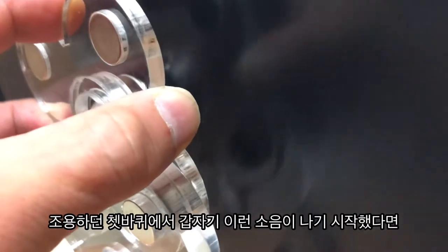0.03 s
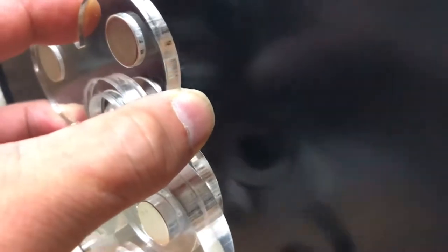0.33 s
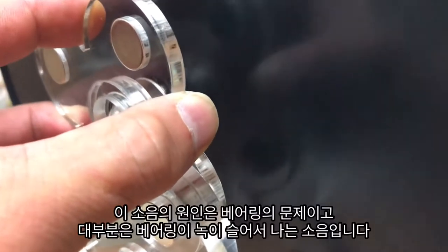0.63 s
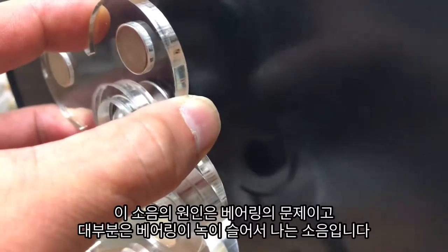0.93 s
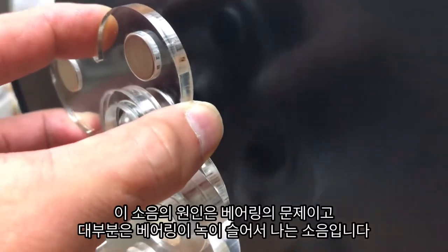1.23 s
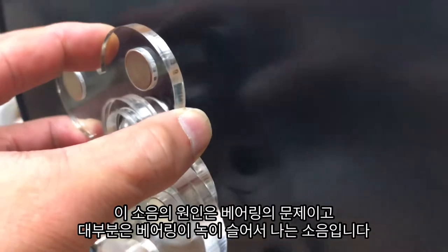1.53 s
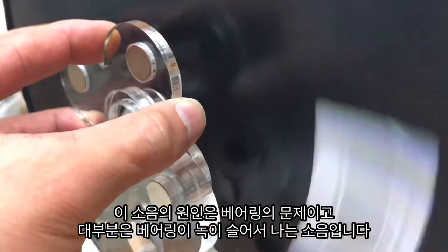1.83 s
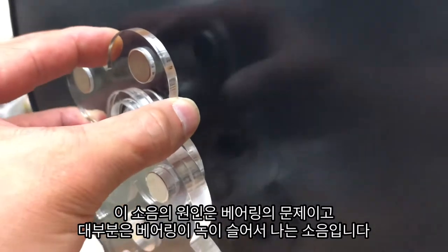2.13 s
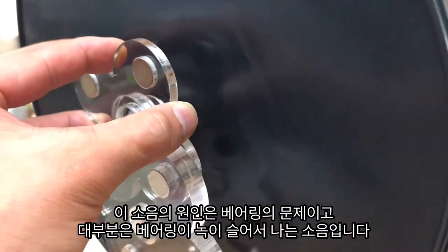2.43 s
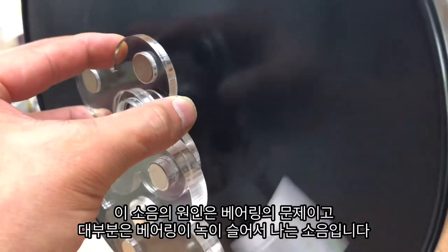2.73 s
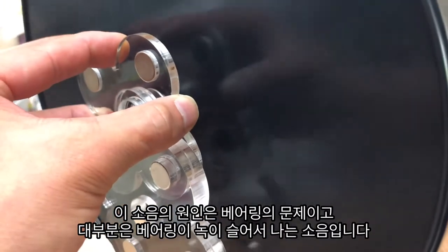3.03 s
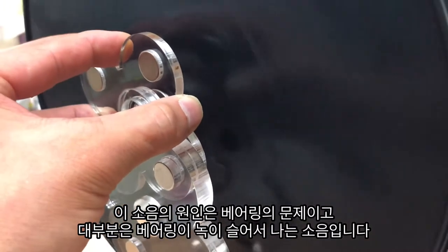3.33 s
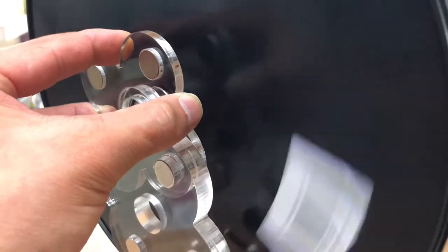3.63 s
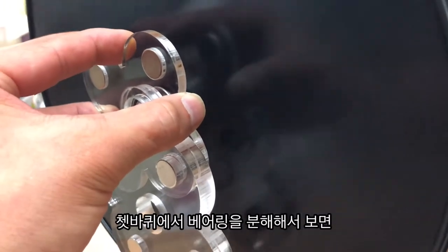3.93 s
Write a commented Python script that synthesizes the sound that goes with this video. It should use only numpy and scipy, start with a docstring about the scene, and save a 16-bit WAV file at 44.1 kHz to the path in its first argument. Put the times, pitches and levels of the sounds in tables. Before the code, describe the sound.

Close up in a quiet room, a spinning hamster wheel rumbles and grinds on a rough bearing, gradually getting slightly softer. Small dull knocks, light plastic clicks and brief finger rubs are scattered over a soft hiss.

```python
"""A low, unevenly booming rumble and a rusty grind: a plastic hamster wheel coasting in a quiet room,
held by its stand close to the microphone. Balls rolling over the bearing's pitted race shake the drum
and make the hub grind; bigger pits knock, and dry steel squeaks faintly once. The stand creaks with
small ticks in the hand and fingers slide on it, over a soft hiss."""
import sys
import numpy as np
from scipy import signal
from scipy.fft import rfft, irfft, next_fast_len
from scipy.io import wavfile
from scipy.ndimage import uniform_filter1d, minimum_filter1d, map_coordinates

SR = 44100
rng = np.random.default_rng(int(sys.argv[2]) if len(sys.argv) > 2 else 0)


def put_to_file(sound):
    """Save the sound as 16-bit audio at rate SR, in the file named by the first command-line argument."""
    columns = np.atleast_2d(sound).T  # one column per channel
    safe = np.clip(columns, -1, 1)
    whole_steps = np.round(safe * 32767)
    wavfile.write(sys.argv[1], SR, whole_steps.astype(np.int16))


N = 176400
T = np.arange(N) / SR

# the drum booms and its pitch bends: (time [s], lift [dB], pitch [Hz])
BOOMS = [(.03, 2.5, 256.3), (.106, 2, 252.3), (.176, 6.5, 254.2), (0.363, 5, 257.2), (.43, 5, 251.2),
         (.526, 3.5, 252.5), (.608, 6.5, 242.2), (0.739, 4.5, 259.8), (1.078, 4.5, 260.8), (1.275, 5, 251),
         (1.467, 4.5, 240.2), (1.538, 4.5, 262), (1.711, 4.5, 239), (1.833, 6, 240.7), (1.978, 5, 245.6),
         (2.413, 2.5, 253.7), (2.537, 6, 245.8), (2.63, 2, 236.5), (2.822, 5.5, 244), (2.875, 7.5, 251.6),
         (3.021, 6.5, 250.5), (3.158, 1.5, 240), (3.27, 6, 246), (3.417, 5.5, 239.7), (3.508, 3.5, 237.7),
         (3.593, 3, 257.4), (3.772, 6.5, 247.8), (3.975, 8, 241)]


def from_db(db):
    """Decibels to gain."""
    return 10 ** (np.asarray(db) / 20)


def unit_rms(x):
    """Scale to an rms of 1."""
    return x / np.sqrt(np.mean(x ** 2) + 1e-20)


def curve(rows):
    """Join (time [s], value) points at every sample."""
    return np.interp(T, *np.transpose(rows))


def swell(time, half_length):
    """A smooth rise and fall around one moment, both in seconds."""
    return np.exp(-((T - time) / half_length) ** 2)


def drift(rate_hz):
    """A smooth random wander with a spread of about 1."""
    step, settle = 40, 2000
    pole = np.exp(-2 * np.pi * rate_hz * step / SR)
    noise = rng.standard_normal(N // step + settle + 2)
    slow = signal.lfilter([1], [1, -2 * pole, pole * pole], noise)[settle:]
    return np.interp(np.arange(N) / step, np.arange(len(slow)), unit_rms(slow))


def coloured(x, response):
    """Pass through a body with this (frequency [Hz], gain [dB]) response, scaled to unit energy."""
    size = 2 * next_fast_len(len(x) // 2 + SR // 10)
    hz, db = np.transpose(response)
    bin_hz = np.arange(size // 2 + 1) * SR / size
    gain = unit_rms(from_db(np.interp(np.log(bin_hz + 1), np.log(hz), db)))
    # minimum phase: the body rings only after it is struck
    cepstrum = irfft(np.log(gain))
    cepstrum[1:size // 2] *= 2
    cepstrum[size // 2 + 1:] = 0
    return irfft(rfft(x, size) * np.exp(rfft(cepstrum)))[:len(x)]


def tilted(response, db_per_octave, pivot_hz=5500):
    """Make a response brighter or duller."""
    return [(hz, db + db_per_octave * np.log2(hz / pivot_hz)) for hz, db in response]


def resonance(hz, width):
    """A steep-sided resonance kept ringing by fine roughness; rms 1."""
    pole = np.exp(-np.pi * width / SR)
    section = [1 - pole, 0, pole - 1, 1, -2 * pole * np.cos(2 * np.pi * hz / SR), pole * pole]
    return unit_rms(signal.sosfilt([section, section], rng.standard_normal(N + SR))[SR:])


def ringing(modes):
    """Several resonances together, each fading or growing at its own rate."""
    return sum(from_db(db + slope * T) * resonance(hz, width) for hz, width, db, slope in modes)


def add(out, time, sound):
    """Mix a short sound in at its time."""
    start = int(np.clip(time * SR, 0, N - 1))
    out[start:start + len(sound)] += sound[:N - start]


def boom_lift_db():
    """How far the booms lift the vibration."""
    return sum(db * swell(time, half_length=0.018) for time, db, _ in BOOMS)


def background_hiss():
    """Soft hiss behind the wheel, a little louder at first."""
    # colour of the hiss: (frequency [Hz], gain [dB])
    colour = [(100, -5), (1500, 17), (3000, 8), (4500, 4.5), (7000, -1.5), (11000, -1), (13500, -7),
              (15000, 3), (16000, -0.5)]
    # its course: (time [s], level [dB])
    levels = [(0, -52.5), (.6, -56.5), (2, -57), (4, -57)]
    return unit_rms(coloured(rng.standard_normal(N), colour)) * from_db(curve(levels))


def finger_rubs():
    """Skin slides over the stand: a grainy rasp when pressed, an airy swish when light."""
    # finger strokes: (middle [s], half length [s], rasp [dB], brightness [dB/octave], swish [dB])
    strokes = [(.069, .028, -52.5, 3, -55), (.238, 0.0031, -66, 0, -48), (0.287, 0.049, -46, .5, -60),
               (.815, .045, -73, 2, -56.5), (1.011, .019, -46.5, 1, -63), (1.222, 0.053, -53, -2.5, -72),
               (1.46, 0.014, -55, -3, -53), (2.255, .035, -57.5, 1, -62), (3.17, .03, -86, 0, -59)]
    # pressed skin: (frequency [Hz], gain [dB])
    rasp_colour = [(1000, 3.5), (2200, -2), (2900, 10), (3600, 2.5), (5000, 4.5), (7000, -1), (11000, -13),
                   (15000, -9)]
    # a light touch: (frequency [Hz], gain [dB])
    swish_colour = [(4000, -28), (8000, -1.5), (12000, -4), (14500, 4), (16000, -1)]
    grain_db = 3.5
    friction = rng.standard_normal(N) * from_db(grain_db * drift(rate_hz=250))
    swish = unit_rms(coloured(rng.standard_normal(N), swish_colour))
    out = np.zeros(N)
    for time, half_length, rasp_db, brightness, swish_db in strokes:
        rasp = unit_rms(coloured(friction, tilted(rasp_colour, brightness)))
        out += swell(time, half_length) * (from_db(rasp_db) * rasp + from_db(swish_db) * swish)
    return out


def stand_ticks():
    """Hard plastic slips in the hand: a faint first slip, then a snap and a brief ring of the stand."""
    # each tick: (time [s], relative level [dB], brightness [dB/octave])
    ticks = [(.007, -36.5, -0.5), (.014, -42, -2.5), (.096, -46, -1), (.318, -43, 1), (.631, -52, -5),
             (.684, -43.5, -1), (0.694, -42, -1.5), (.983, -38.5, -1.5), (1.001, -41, 0), (1.016, -42, 0),
             (1.118, -39.5, -.5), (1.149, -38.5, -0.5), (1.156, -42, 1), (1.162, -41, 0),
             (1.193, -38.5, -1), (1.21, -41, -2), (1.227, -39, 1), (1.236, -43, -3), (1.422, -44, -1),
             (1.443, -39.5, -1), (1.452, -32, 2), (1.477, -43, 3), (1.594, -44, .5), (1.6, -37, .5),
             (1.722, -44.5, -4.5), (1.727, -46, -4), (2.095, -40, .5), (2.099, -40, 0), (2.143, -46.5, -1),
             (2.218, -40.5, 1.5), (2.221, -43, -1), (2.234, -42, 3), (2.252, -42, 1), (2.254, -42.5, 1),
             (2.272, -40, 1), (2.277, -45, 0), (2.411, -42, 1.5), (2.472, -51.5, -4), (2.585, -44, 0.5),
             (2.605, -48, -2), (3.586, -50.5, -3.5), (3.656, -45.5, -1)]
    # snapping plastic: (frequency [Hz], gain [dB])
    snap_colour = [(800, -28), (2000, 0.5), (2900, 3), (3700, 2.5), (4600, -1), (6500, 2), (9000, -1.5),
                   (12000, -3), (16000, -9)]
    # resonances of the stand: (frequency [Hz], relative level [dB], decay [s])
    stand_modes = [(2887, -20.5, .003), (3830, -25, 0.0028), (5970, -31.5, 0.0024), (8650, -33, 0.0033)]
    rise_s, decay_s, tail_s, tail_db = 0.00045, 0.001, 0.011, -28
    gain_db, slip_db, slip_lead_s = 15.5, -19, 0.0042
    out, t = np.zeros(N), T[:SR // 20]
    rise = 1 - np.exp(-(t / rise_s) ** 2)
    envelope = rise * (np.exp(-t / decay_s) + from_db(tail_db) * np.exp(-t / tail_s))
    for time, db, brightness in ticks:
        colour = [(hz, level + rng.normal(0, 1.5)) for hz, level in tilted(snap_colour, brightness)]
        slip, snap = [coloured(rng.standard_normal(len(t)) * envelope, colour) for _ in range(2)]
        ring = np.zeros(len(t))
        for hz, level, decay in stand_modes:
            amplitude = from_db(level + rng.normal(0, 2)) * np.exp(-t / decay)
            ring += amplitude * np.sin(2 * np.pi * hz * rng.normal(1, 0.035) * t)
        ring *= rise * from_db(-1.8 * brightness)  # duller snaps ring more
        add(out, time - slip_lead_s, from_db(db + gain_db + slip_db) * slip / np.linalg.norm(slip))
        add(out, time, from_db(db + gain_db) * (snap / np.linalg.norm(snap) + ring))
    return out


def bearing_squeak():
    """Dry steel in the bearing sings for a moment, faint and thin."""
    return from_db(-67) * swell(time=1.66, half_length=0.06) * resonance(hz=8550, width=350)


def pit_knocks():
    """A ball drops into a bigger pit and gives a brief, dull clatter in the hub."""
    # each drop: (time [s], relative level [dB])
    drops = [(0.019, -21), (.344, -28), (0.43, -29), (0.603, -27), (.624, -22.5), (0.757, -27), (.882, -25),
             (0.937, -30), (.954, -23), (1.067, -26.5), (1.16, -30), (1.193, -26), (1.273, -31),
             (1.321, -29.5), (1.511, -29), (1.575, -31), (2.009, -29), (2.487, -40), (2.508, -34),
             (2.917, -40), (3.398, -35), (3.43, -34.5), (3.76, -30.5), (3.837, -31.5)]
    # the hub's response to a drop: (frequency [Hz], gain [dB])
    colour = [(250, -41), (450, -1), (620, 6), (800, 3.5), (1050, 7.5), (1350, -3), (1550, -18.5),
              (4000, -39), (16000, -38)]
    gain_db, decay_s = 15.5, 0.0015
    out, t = np.zeros(N), T[:SR // 20]
    for time, db in drops:
        knock = coloured(rng.standard_normal(len(t)) * np.exp(-t / decay_s), colour)
        add(out, time, from_db(db + gain_db) * knock / np.linalg.norm(knock))
    return out


def bearing_grind():
    """Dense contacts with rust grains excite the hub, harder in the booms, softer as the wheel slows."""
    # how hard the bearing grinds: (time [s], relative level [dB])
    levels = [(0, -38.5), (.9, -39.5), (1.6, -41.5), (2.2, -42.5), (2.9, -44), (4, -44)]
    # the response of hub and drum wall to one contact: (frequency [Hz], gain [dB])
    hub_colour = [(200, -14), (400, -1.5), (470, 6), (545, 5), (610, 8.5), (640, 4.5), (675, -1),
                  (800, 0.5), (1000, 1), (1130, 0), (1220, -3.5), (1350, -1.5), (1500, -16), (2300, -22),
                  (2900, -18.5), (3400, -25.5), (6000, -29), (16000, -53)]
    # ringing resonances of the hub: (frequency [Hz], width [Hz], starting level [dB], slope [dB/s])
    hub_modes = [(478.5, 5.6, -52.5, -.5), (527.4, 5.2, -57.5, -1), (601, 84, -41, -4.5),
                 (2436, 9.7, -82, 1.5)]
    contacts_per_s, spread_db, gain_db = 2200, 2, 0.5
    chatter_db, surge_db, waver_db = 1.42, 1.23, 1
    sizes = from_db(spread_db * np.minimum(rng.exponential(1, N), 4)) * rng.choice([-1, 1], N)
    load_db = chatter_db * drift(rate_hz=52) + surge_db * drift(rate_hz=5.1) + 0.18 * boom_lift_db()
    contacts = sizes * (rng.random(N) < contacts_per_s / SR) * from_db(load_db)
    grind = unit_rms(coloured(contacts, hub_colour)) * from_db(curve(levels) + gain_db)
    waver = from_db(waver_db * drift(rate_hz=5.9))
    return grind + waver * ringing(hub_modes)


def drum_rumble():
    """Rolling keeps the drum ringing: it booms, bends and dips, while the whole wheel shudders below."""
    # how hard the rolling shakes the drum: (time [s], relative level [dB])
    levels = [(0, -30), (1.5, -28.5), (2.1, -33), (3, -32.5), (4, -33.5)]
    # main resonances of the drum: (frequency [Hz], width [Hz], relative level [dB], slope [dB/s])
    main_modes = [(218, 36.4, -12, 1), (241.85, 28.8, -2.5, 0.65), (266.9, 34.5, -7, -0.54),
                  (296.8, 43, -9.5, -0.34)]
    # its low body resonances: (frequency [Hz], width [Hz], relative level [dB], slope [dB/s])
    body_modes = [(131.6, 23.6, -12.5, -1.5), (156.5, 32, -11.5, -1.2), (195.2, 64, -10, -0.37)]
    # the main resonances dip briefly: (time [s], change [dB])
    lulls = [(.223, -4), (1.751, -3.5), (1.87, -2.5), (1.934, -3.5), (2.04, -2.5), (2.179, -2.5),
             (3.07, -6.5), (3.869, -1.5)]
    # the low body swells: (time [s], lift [dB])
    heaves = [(.07, 4.5), (.5, 4.5), (.98, 5.5), (1.09, 3.5), (1.27, 2), (1.61, 5), (1.76, 4), (1.9, 5.5),
              (2.4, 4.5), (3.37, 6)]
    # low shudder of the whole wheel: (frequency [Hz], gain [dB])
    shudder_colour = [(18, -43), (30, -10), (42, 0.5), (58, 4), (90, 2.5), (130, 0), (300, -8),
                      (500, -35.5)]
    rest_hz, bend_s, swell_s = 247.5, 0.02495, 0.026
    main_db, body_db, shudder_db = -0.5, 0.35, -47
    even_s, even_share = 0.04, 0.65
    body, main = ringing(body_modes), ringing(main_modes)
    bend = sum((hz / rest_hz - 1) * swell(time, bend_s) for time, _, hz in BOOMS)
    main = map_coordinates(main, [np.cumsum(1 + bend)], order=3, mode="mirror")
    # partly even out the random flutter so that the booms stand out
    power = uniform_filter1d(main ** 2, int(even_s * SR)) + 1e-9
    main = unit_rms(main / power ** (even_share / 2))
    lull_db = sum(db * swell(time, swell_s) for time, db in lulls)
    heave_db = sum(db * swell(time, swell_s) for time, db in heaves)
    main *= from_db(main_db + boom_lift_db() + lull_db)
    body *= from_db(body_db + heave_db)
    rolling_db = curve(levels)
    shudder = unit_rms(coloured(rng.standard_normal(N), shudder_colour))
    shudder *= from_db(shudder_db + 0.31 * (rolling_db - rolling_db.mean()))  # loosely follows the roll
    return from_db(rolling_db) * (main + body) + shudder


def scene():
    """Wheel and hand close to one microphone, with the hiss behind them."""
    hiss = background_hiss()
    wheel = drum_rumble() + bearing_grind() + pit_knocks()
    hand = stand_ticks() + finger_rubs()
    return (hiss + hand + wheel + bearing_squeak())[None]


def record(dry):
    """The recorder's limiter eases the loudest booms; the top is cut steeply."""
    limit_db, window_s, cutoff_hz = -14, 0.0072, 15850
    window = int(window_s * SR)
    gain = np.minimum(1, from_db(limit_db) / (np.abs(dry) + 1e-9))
    smooth_gain = uniform_filter1d(minimum_filter1d(gain, window), window)
    lowpass = signal.ellip(12, 0.1, 80, cutoff_hz, fs=SR, output="sos")
    return signal.sosfilt(lowpass, dry * smooth_gain)


dry = scene()
out = record(dry)
put_to_file(out)
```